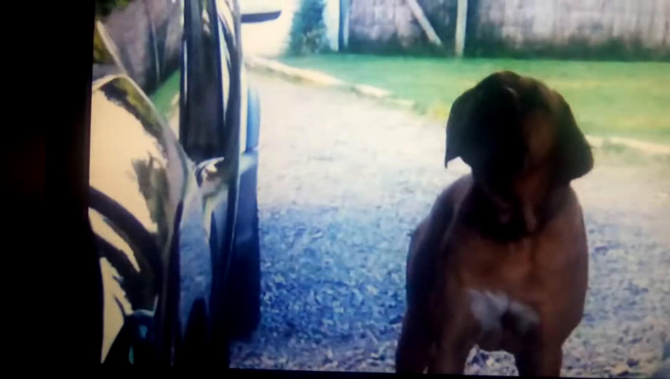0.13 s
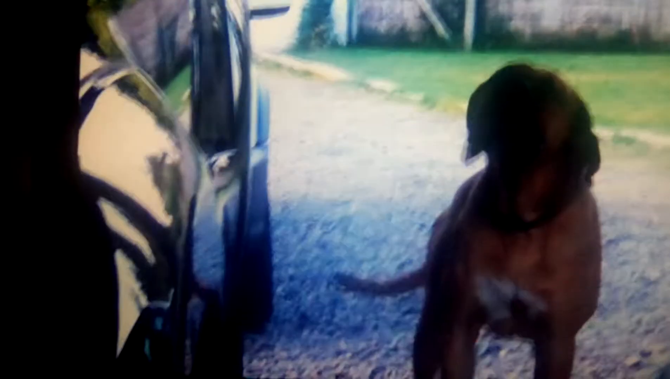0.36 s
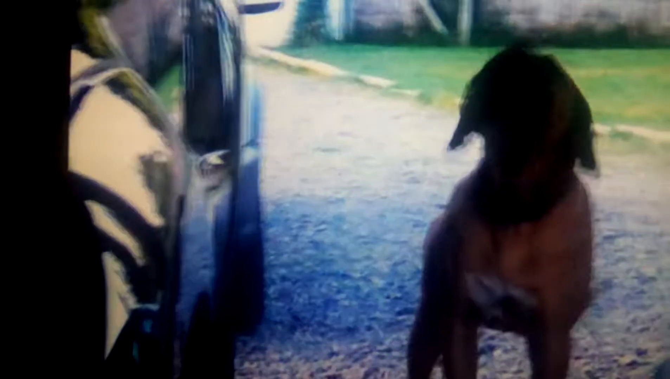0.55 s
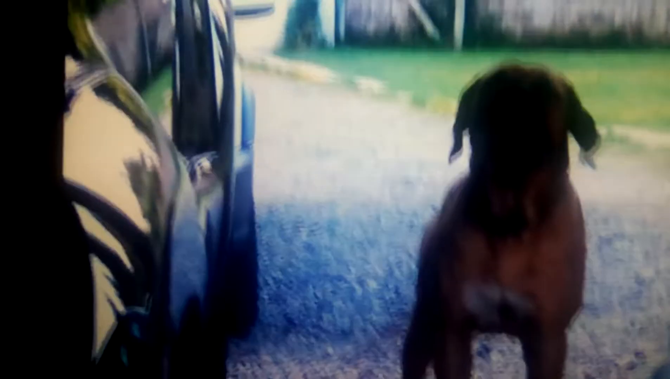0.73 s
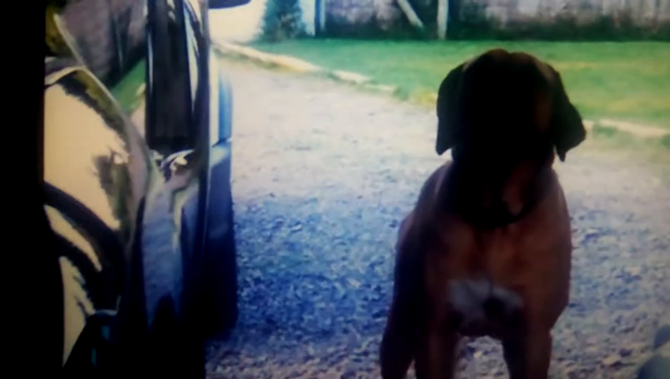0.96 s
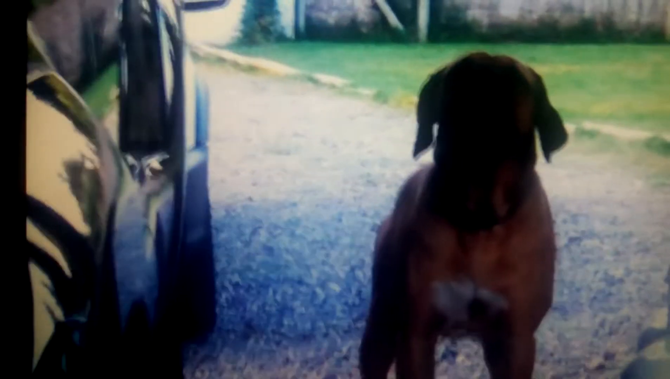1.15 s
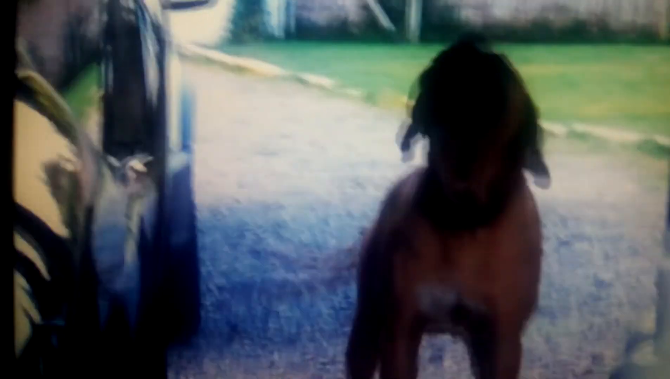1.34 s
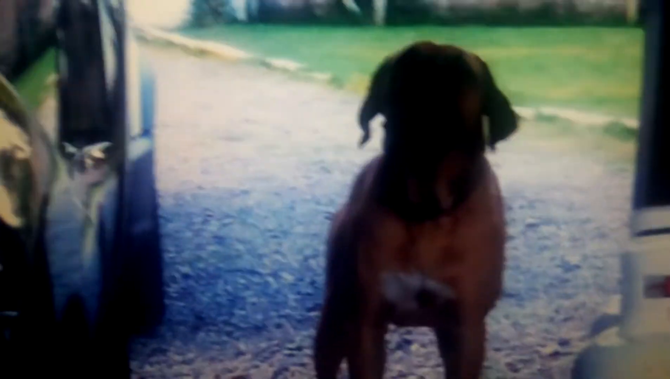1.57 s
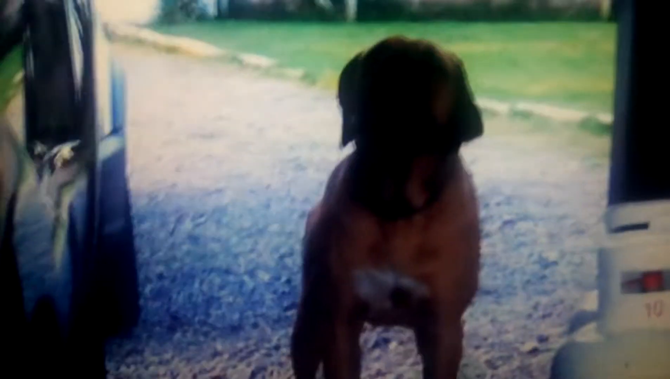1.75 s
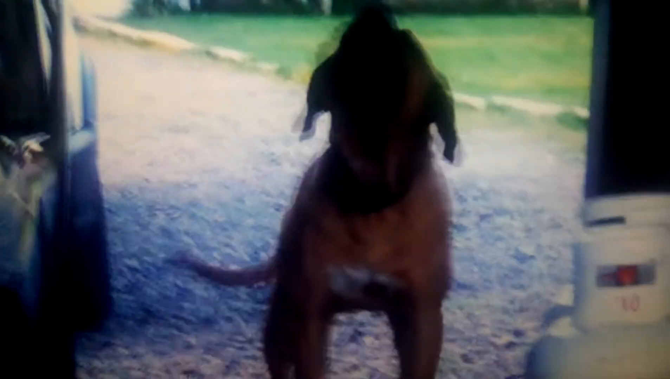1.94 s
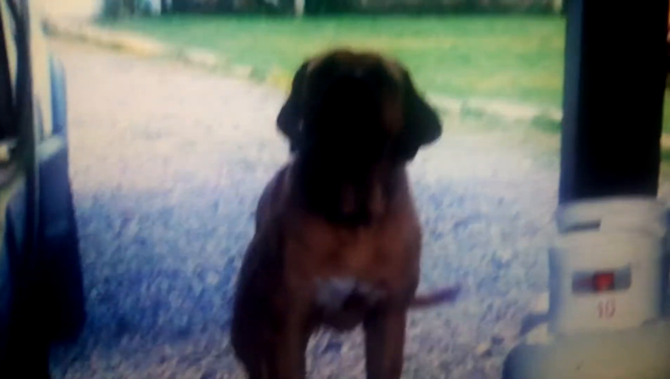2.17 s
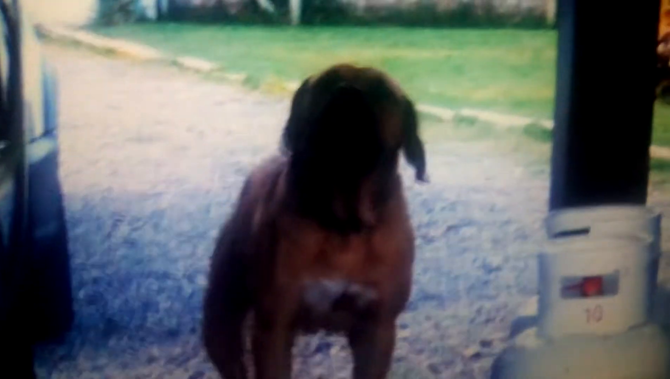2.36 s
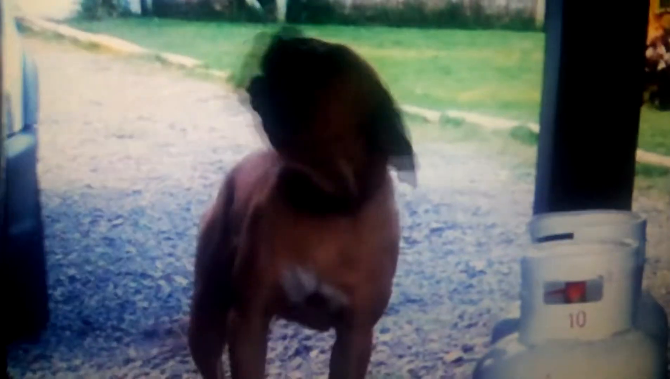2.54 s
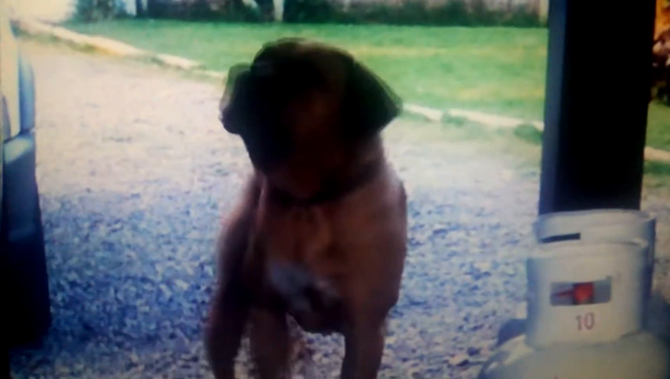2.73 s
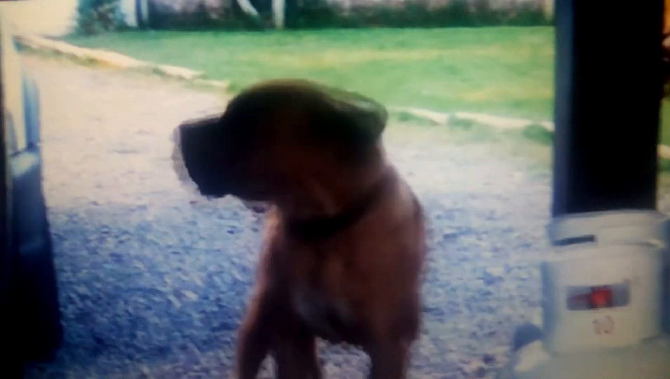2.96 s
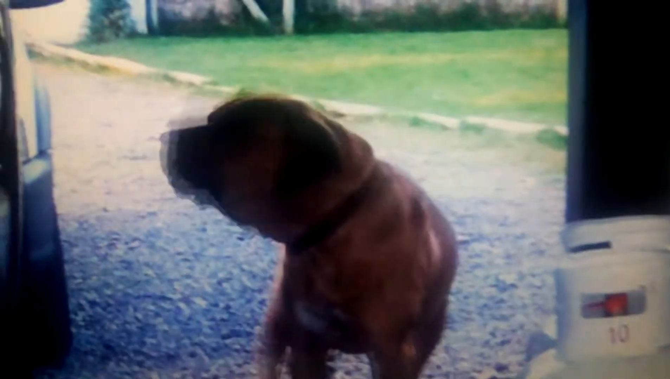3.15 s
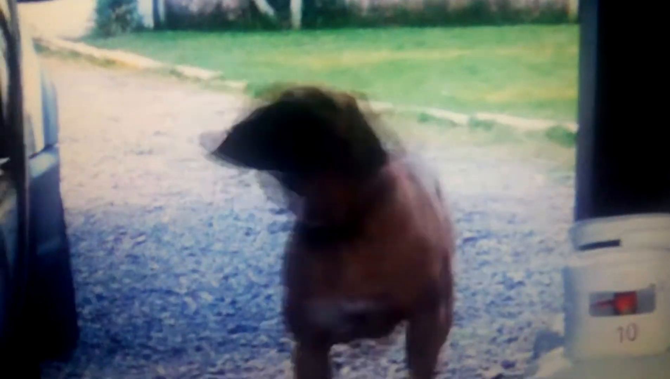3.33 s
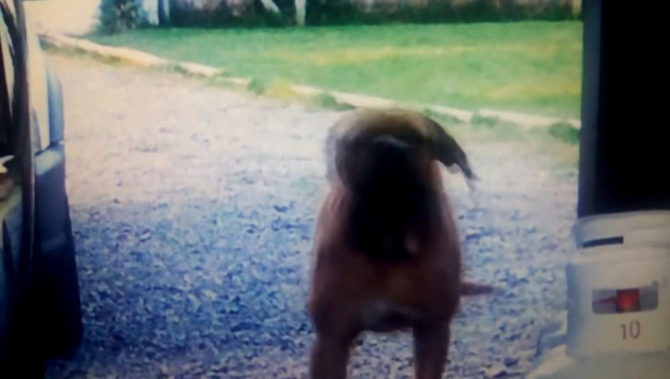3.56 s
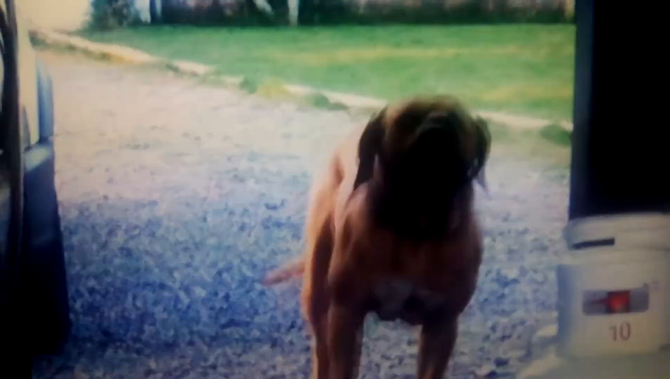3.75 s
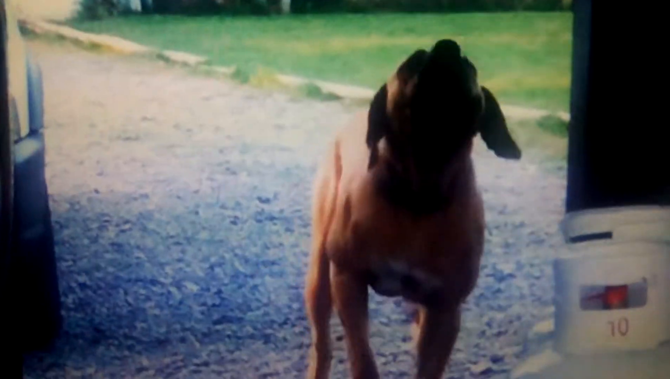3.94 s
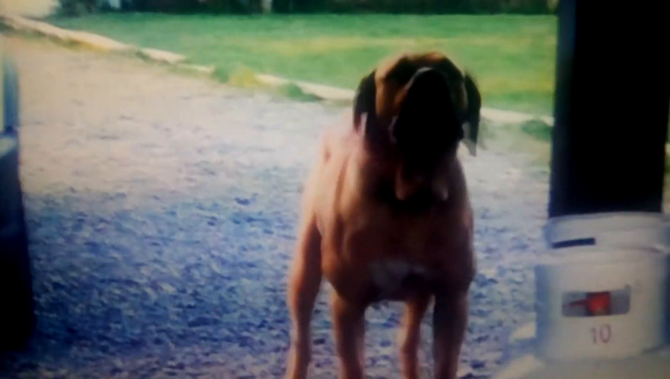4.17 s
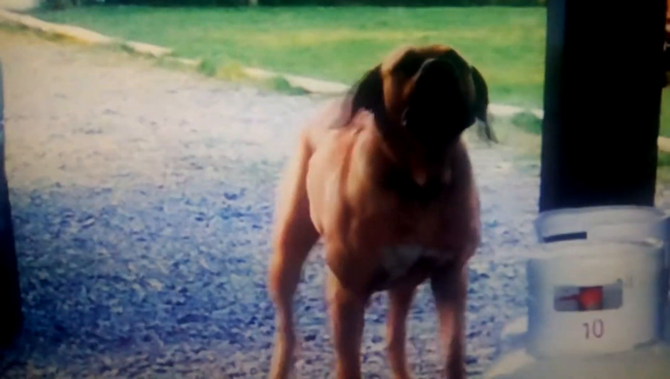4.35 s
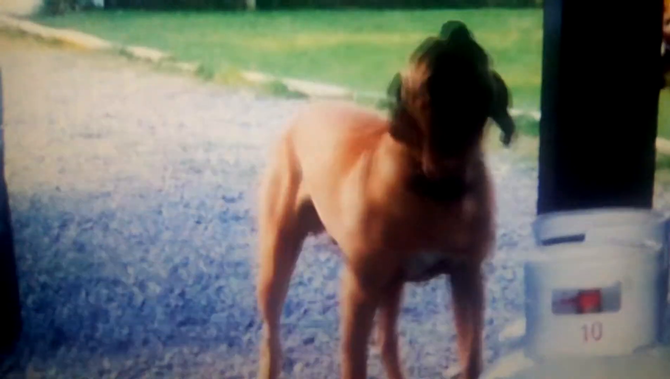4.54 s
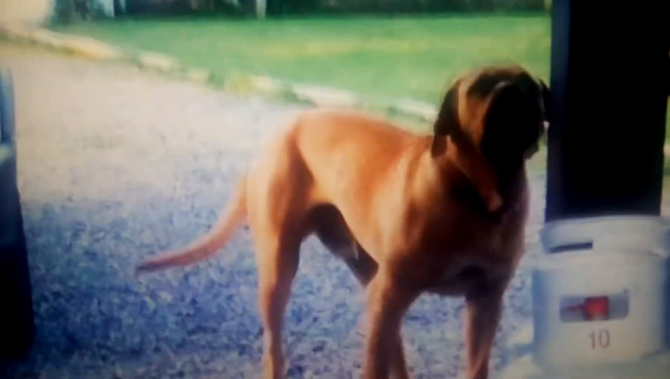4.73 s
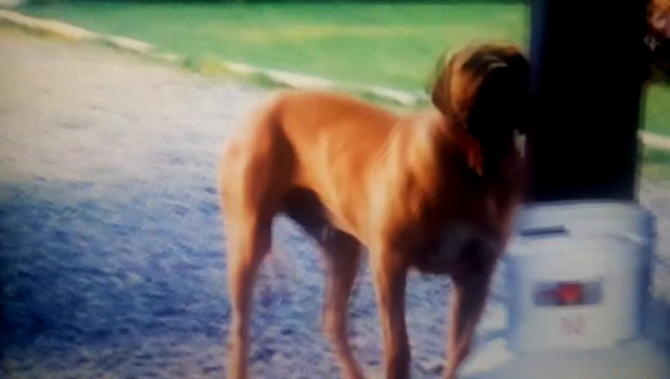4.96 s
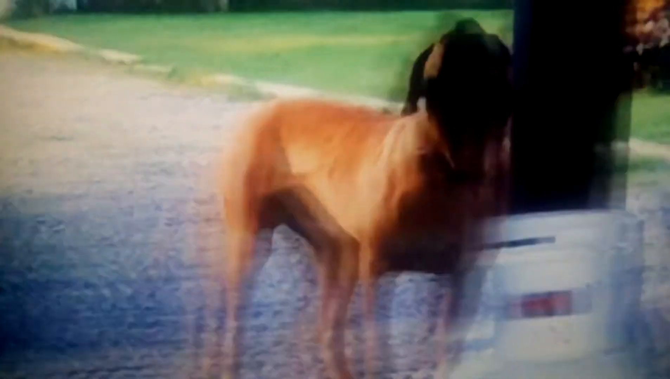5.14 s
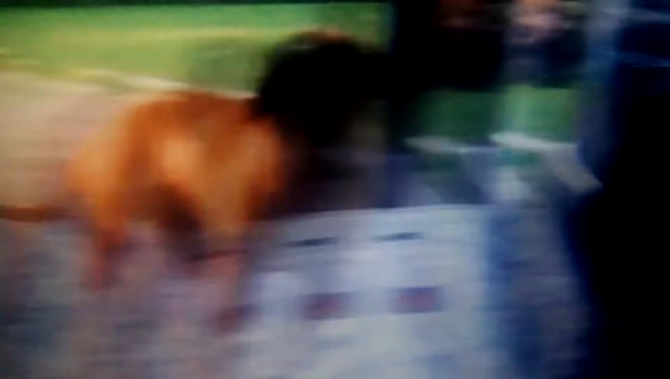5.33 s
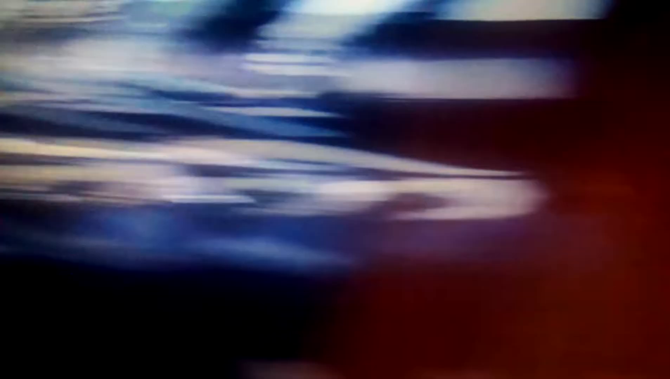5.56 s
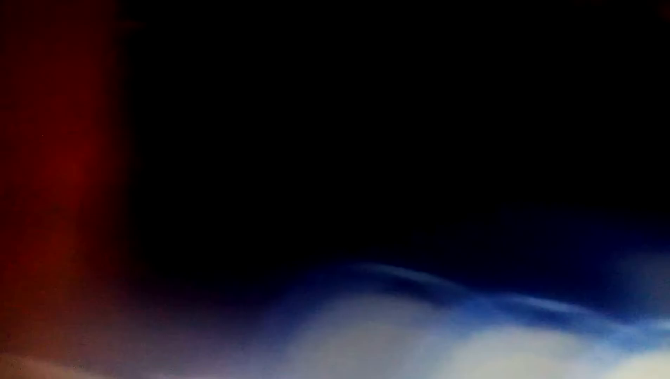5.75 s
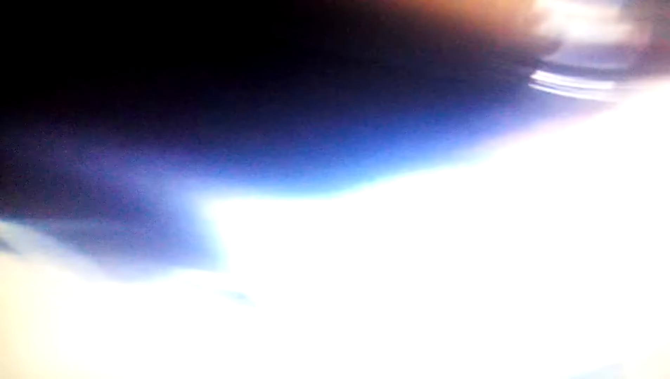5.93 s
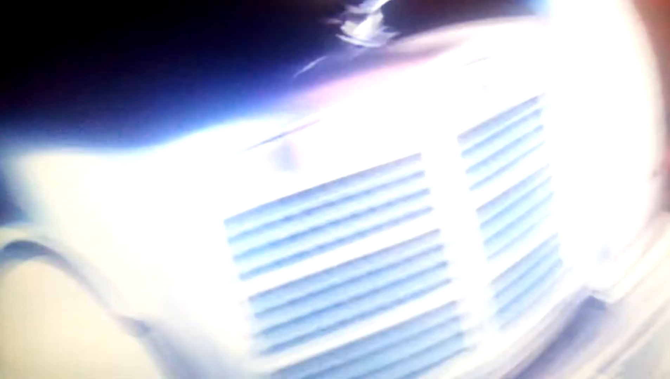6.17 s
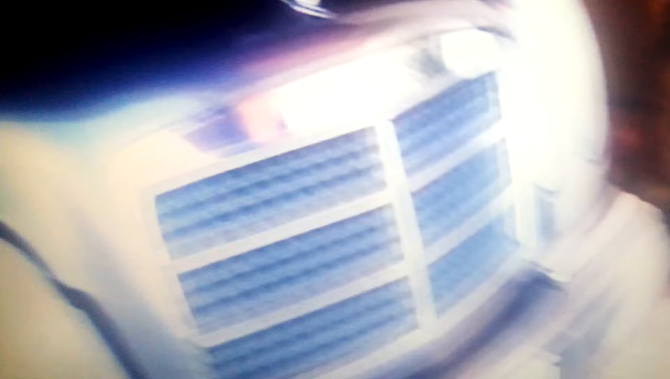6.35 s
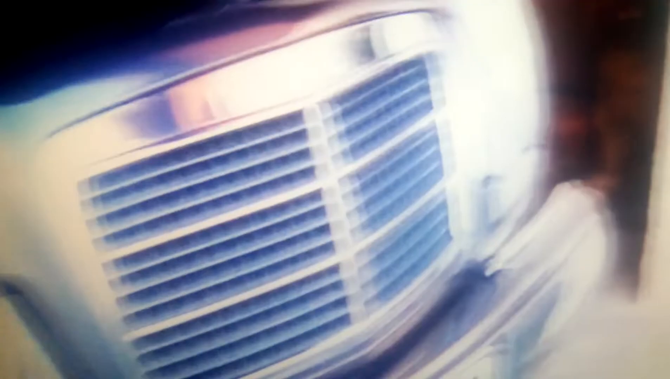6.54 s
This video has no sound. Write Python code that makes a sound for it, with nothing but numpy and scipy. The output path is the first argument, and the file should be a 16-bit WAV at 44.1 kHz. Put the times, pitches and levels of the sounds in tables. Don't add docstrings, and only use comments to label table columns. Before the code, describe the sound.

A large dog stands a few metres from a small camera microphone at a garage mouth and barks nine times, in short, hoarse, chesty bursts. The garage adds a brief boxy ring. Between barks a collar tag ticks and faintly scrapes, and small bumps knock. Faint hum, low rumble and hiss continue underneath; one electrical click comes before the final, strongest bark.

```python
import sys
import numpy as np
from scipy import signal
from scipy.fft import rfft, irfft, next_fast_len
from scipy.io import wavfile
from scipy.ndimage import uniform_filter1d, map_coordinates

SR = 44100
rng = np.random.default_rng(int(sys.argv[2]) if len(sys.argv) > 2 else 0)


def file_out(sig):
    cols = np.atleast_2d(sig).T
    lim = np.clip(cols, -1, 1)
    pcm = np.round(lim * 32767).astype(np.int16)
    wavfile.write(sys.argv[1], SR, pcm)


def magnitude_from_level(level_db):
    exponent = np.asarray(level_db, float) / 20
    return 10 ** exponent


N = 295313
TIME_S = np.arange(N) / SR

# frequency in Hz, level in dB, width in Hz.
HUM_LINES = [(52.7, -71.5, 3), (58.3, -63, 2.83), (119.3, -66.5, 4.7), (136.6, -69.5, 5.3),
             (161.9, -63, 3.026), (180, -63, 3.92), (3720, -80.5, 130), (8200, -76, 960), (295.2, -67, 4.1),
             (12898, -94, 2.4)]
# frequency in Hz, density in dB per Hz.
HISS_SPECTRUM = [(120, -19), (200, -4.5), (215, -6.5), (293, -1.5), (321, -7), (351, -5), (714, -10.5),
                 (796, -12), (1770, -18), (2370, -18.5), (15400, -22)]
# frequency in Hz, density in dB per Hz.
RUMBLE_SPECTRUM = [(22, -39), (32, -19), (45, -38), (70, -0.5), (100, -9.5), (170, -8), (240, -22.5),
                   (300, -50)]
# start in seconds, level in dB, width in seconds, coupling time constant in seconds.
GLITCH_STEP = (5.92548, -24, .00038, .0011)
# frequency in Hz, width in Hz, level in dB.
GARAGE_MODES = [(372, 32, 2), (391, 6.9, 3), (421.4, 33, -2), (491, 13, 2.5), (706, 23, 6.5), (676, 20, -7),
                (754.5, 3, -6), (905, 27, 5), (1040, 6.3, -20), (1156, 22, 10), (1290, 8.4, -13),
                (1280, 28, 4), (1397, 3.7, 6), (2000, 14, 5)]
# frequency in Hz, t60 in seconds.
WALL_DECAY = [(300, 0.32), (1200, 0.33), (4000, 0.32), (10000, 0.087)]
# time in seconds, peak in dB, frequency in Hz, t60 in seconds.
BUMPS = [
    (1.108, -41, 496, 0.018),
    (1.107, -47, 3200, .008),
    (2.981, -40, 2000, 0.006),
    (6.549, -40, 490, 0.081),
    (6.549, -38, 1350, 0.024),
    (6.549, -46, 3400, 0.015),
]
# time in seconds, peak in dB, frequency in Hz, t60 in seconds.
TAG_TICKS = [
    (1.0768, -46, 7850, .005),
    (1.0878, -38, 9280, .004),
    (1.0912, -41, 9500, .002),
    (1.0920, -20, 8240, 0.002),
    (1.0932, -38, 7600, .004),
    (2.79, -45, 8100, 0.008),
    (2.842, -40, 7600, 0.01),
    (2.843, -43, 9600, .009),
]
# start, strongest and end in seconds, level in dB.
TAG_SLIDES = [
    (2.1, 2.25, 2.45, -68),
    (2.788, 2.791, 2.815, -54),
    (2.84, 2.843, 2.895, -56),
    (3.62, 3.84, 3.87, -61),
    (4.3, 4.42, 4.48, -71),
    (4.9, 4.97, 5.05, -60),
]
# start in seconds, length in seconds, pitch in Hz, level in dB.
WHINE_NOTES = [
    (6.2, 0.19, 420, -57.5),
    (4.42, 0.092, 150, -55),
]

# start in seconds, effort in dB, peak held until in seconds, pitch in Hz, roughness 0-1.
BARK_CALLS = [
    (0.427, -47, 0.072, 372, 1.12),
    (1.215, -40.5, 0.051, 344.3, 0.89),
    (1.872, -43.5, 0.063, 380.6, 0.9),
    (2.447, -48.5, 0.099, 372, 1.1),
    (3.198, -42, 0.068, 372, 0.43),
    (3.845, -44, 0.095, 355.2, 0.51),
    (4.477, -42, 0.081, 367.5, 0.34),
    (5.088, -43, 0.13, 372, 0.96),
    (6.292, -38.5, 0.082, 372, 0.7),
]
# level in dB over effort, surge in seconds after start, surge in dB,
# held until in seconds, pitch climb in Hz.
CHEST_MOVES = [
    (7, 0.048, -6.5, 0.073, 55),
    (-11, 0.14, 8, 0.13, 41),
    (-4.5, 0.06, 9.5, 0.17, 45),
    (4.5, 0.079, 4.5, 0.163, 40),
    (1.5, 0.064, 7, 0.12, 8),
    (3.5, 0.056, 13, 0.1, 22),
    (7.5, .068, 13, 0.079, 28),
    (5.5, 0.063, 11.5, 0.14, 50),
    (6.5, 0.076, 8.5, 0.12, 22),
]
# mouth level in dB over effort, held until in seconds, widest opening 0-1,
# shut by in seconds, nose level in dB over effort.
JAW_MOVES = [
    (13.5, 0.118, 0.77, 0.11, 4),
    (9, 0.15, 0.61, 0.12, 6),
    (13, .1, 0.86, .2, 6),
    (14, 0.14, 0.91, 0.18, 6.5),
    (10.5, 0.12, 0.2, 0.15, 5.5),
    (9, 0.177, 0.4, 0.114, 4),
    (6, 0.16, 0.37, 0.07, 5.5),
    (9.5, 0.16, 1, .7, 4),
    (8, 0.14, 0.13, 0.22, 3.5),
]
# attack over the usual one, width of the chest surge in seconds.
BARK_PACE = [
    (1.01, .02),
    (1.01, 0.073),
    (1.01, 0.039),
    (1.01, .05),
    (1.01, 0.024),
    (1.01, 0.014),
    (1.01, .015),
    (1.3, 0.015),
    (1.1, 0.034),
]
# frequency in Hz, width in Hz, level in dB.
NOSE_MODES = [
    [(1200, 200, -6), (1785, 41, -2.5)],
    [(1167, 53, 5), (1670, 35, -4), (1870, 61, -22)],
    [(1112, 43, 16.5), (1344, 24, 10.5), (1616, 85, 5)],
    [(1162, 47, 1.5), (1655, 39, -1.5)],
    [(1092, 91, -0.5), (1410, 38, -10), (1604, 40, -10), (2000, 10, -16)],
    [(1010, 200, 4), (1884, 44, 0)],
    [(1146, 130, 4.5), (1604, 46, -6.5), (1893, 11.5, 10.5)],
    [(1233, 14, -2), (1479, 3.4, -2), (1625, 22, -15.5), (1847, 74, -6.5)],
    [(1050, 125, 10), (1563, 10, 4), (1680, 36, 4), (1850, 8.3, 5)],
]
# frequency in Hz, width in Hz, level in dB.
TEETH_POCKETS = [
    [(2354, 35, -0.5), (2830, 30, -6), (5400, 60, -4), (6760, 51, -12)],
    [(2400, 55, 3), (3200, 300, -2), (6500, 120, -3.5), (8300, 70, -5)],
    [(2760, 18, -4), (5240, 37, -8), (6700, 62, -4), (8170, 38, 0)],
    [(3200, 25, 8), (3860, 39, 8), (6080, 47, 11.5), (7950, 250, 10)],
    [(2860, 100, -2.5), (4670, 54, -15), (5570, 27, -14), (6800, 100, -20)],
    [(3160, 82, 6), (6100, 66, 2), (7070, 49, -7), (7900, 110, -9)],
    [(2664, 17, 9), (3530, 39, 4), (6430, 71, 6), (7900, 34, -3)],
    [(2360, 36, 4), (3100, 73, 4.5), (3960, 99, -1.5), (7050, 35, 4)],
    [(3040, 790, 3), (3800, 42, 2), (5730, 31, 6), (7140, 57, -13)],
]
# frequency in Hz, width in Hz, level in dB.
CHEST_MODES = [(387, 232, 29.5)]
# frequency in Hz, width in Hz, level in dB.
MOUTH_MODES = [(684, 32, 0), (774, 32, 0), (884, 30, 0)]
# frequency in Hz, width in Hz, level in dB.
SINUS_MODES = [(1017, 92, -16.5), (1387, 43, -14.5), (1847, 120, -8.5)]
# frequency in Hz, width in Hz, level in dB.
LARYNX_MODES = [(492.4, 16.5, 0)]
# frequency in Hz, width in Hz, level in dB.
PALATE_POCKETS = [(3233, 15, -6.5), (3870, 30, -3)]
# frequency in Hz, density in dB per Hz.
BREATH_SPECTRUM = [(280, -28), (340, 7.5), (440, 8.5), (482, -2), (530, 4), (620, -16), (885, 5.5),
                   (960, -53), (1050, 6.5), (1400, -11), (2200, -14.5), (2600, -57)]
# frequency in Hz, density in dB per Hz.
RASP_SPECTRUM = [(1240, -24), (2100, -6.5), (2230, -27), (2340, -5.5), (2980, -5.5), (4640, -12.5),
                 (5290, -12.5), (5700, -10.5), (6110, -10.5), (6640, -7.5), (8040, -7.5), (8950, -14),
                 (13000, -30)]
ATTACK_S = {"chest": 0.032, "mouth": 0.044, "nose": 0.049, "rasp": 0.049}
RISE_DB = {"chest": 26.5, "mouth": 28.5, "nose": 29.5, "rasp": 16}
RELEASE_DB_PER_S = {"chest": 158, "mouth": 142, "nose": 131, "rasp": 133}
DROP_DB = {"chest": 7, "mouth": 13, "nose": 4, "rasp": 1.5}

BARK_LENGTH_S, DROP_S, NOSE_LAG_S = 0.3, 0.025, 0.026
CLIMB_S, WIDEST_S = 0.12, 0.069
SURGE_ROBS = 0.43
BITE_DB, BITE_AT_S, BITE_S = -1, 0.033, 0.0067
GAPE_S, GAPE_HZ = 0.037, 4600
POCKETS_CLOSE_DB_PER_S = 42
HISS_DB, RUMBLE_DB, JINGLE_SWELL_DB = -57, -62, 7
TOP_HZ = 15525


def unit(x):
    return x / np.sqrt(np.mean(x ** 2) + 1e-20)


def along(points, hz):
    point_hz, value = np.transpose(points)
    return np.interp(np.log(hz + 1), np.log(point_hz + 1), value)


def wobble(rate_hz):
    knots = rng.standard_normal(int(N * rate_hz / SR) + 4)
    return map_coordinates(knots, [TIME_S * rate_hz])


def drift(length, size):
    return unit(uniform_filter1d(rng.standard_normal(length), size=size))


def filtered(x, response):
    m = next_fast_len(len(x) + SR // 2)
    return irfft(rfft(x, m) * response(np.fft.rfftfreq(m, 1 / SR)), m)[:len(x)]


def shaped(x, spectrum):
    return filtered(x, lambda f: magnitude_from_level(along(spectrum, f)))


def modes(table):
    def response(f):
        return sum((-1) ** k * magnitude_from_level(db) * 1j * f * w / (c * c - f * f + 1j * f * w)
                   for k, (c, w, db) in enumerate(table))
    return response


def steep(table):
    return lambda f: modes(table)(f) ** 2


def hum():
    lines = np.zeros(N)
    for hz, db, width_hz in HUM_LINES:
        level = np.sqrt(2) * magnitude_from_level(db + 3.3 * wobble(width_hz + 1))
        lines += level * np.sin(2 * np.pi * hz * TIME_S + 1.02 * wobble(width_hz + 1))
    hiss = unit(shaped(rng.standard_normal(N), HISS_SPECTRUM))
    rumble = unit(shaped(rng.standard_normal(N), RUMBLE_SPECTRUM))
    return lines + magnitude_from_level(HISS_DB + 0.13 * wobble(2.55)) * hiss + magnitude_from_level(RUMBLE_DB) * rumble


def glitch():
    start_s, db, width_s, droop_s = GLITCH_STEP

    def step(t):
        return np.heaviside(t, 1) * np.exp(-np.abs(t) / droop_s)
    return magnitude_from_level(db) * (step(TIME_S - start_s) - step(TIME_S - start_s - width_s))


def garage(x):
    hz, t, z = signal.stft(rng.standard_normal(SR // 2), SR, nperseg=256)
    decay = magnitude_from_level(-60 * t / along(WALL_DECAY, hz)[:, None])
    tail = signal.istft(z * decay, SR, nperseg=256)[1]
    late = np.pad(x, (400, 0))
    diffuse = signal.fftconvolve(late, tail / np.linalg.norm(tail))[:N]
    return magnitude_from_level(-1.5) * x + magnitude_from_level(-8) * filtered(x, modes(GARAGE_MODES)) + magnitude_from_level(-9.5) * diffuse


def taps(events, spread):
    out, t = np.zeros(N + SR), np.arange(SR // 8) / SR
    for start_s, db, hz, t60_s in events:
        blur = 1 + spread * uniform_filter1d(rng.standard_normal(len(t)), size=8)
        ring = np.sin(2 * np.pi * hz * t) * blur
        envelope = magnitude_from_level(db - 60 * t / t60_s) * (1 - np.exp(-t / 0.00005))
        out[round(start_s * SR):][:len(t)] += envelope * ring
    return out[:N]


def tag():
    level = np.zeros(N)
    for *times_s, db in TAG_SLIDES:
        edge_db = db - JINGLE_SWELL_DB
        level += magnitude_from_level(np.interp(TIME_S, times_s, [edge_db, db, edge_db], left=-120, right=-120))
    flicker = rng.standard_normal(N) * magnitude_from_level(2.1 * wobble(130))
    slide = filtered(flicker, modes([(6940, 840, 1.5), (8340, 700, 4.5)]))
    return level * unit(slide) + taps(TAG_TICKS, spread=0.32)


def whine():
    out = np.zeros(N)
    for start_s, length_s, hz, db in WHINE_NOTES:
        envelope = np.sin(np.pi * np.clip((TIME_S - start_s) / length_s, 0, 1)) ** .5
        out += magnitude_from_level(db) * envelope * np.sin(2 * np.pi * hz * TIME_S + 0.47 * wobble(30))
    return np.sqrt(2) * out


def swell(t, part, held_s, pace):
    after = np.maximum(t - held_s, 0)
    rise = -RISE_DB[part] * np.clip(1 - t / (pace * ATTACK_S[part]), 0, 1) ** 2
    drop = -DROP_DB[part] * np.minimum(after / DROP_S, 1)
    return rise + drop - RELEASE_DB_PER_S[part] * after


def controls(call, chest, jaw, pace, surge_width_s):
    _, effort_db, held_s, pitch_hz, _ = call
    chest_over_db, surge_at_s, surge_peak_db, chest_held_s, climb_hz = chest
    mouth_over_db, mouth_held_s, widest, shut_s, nose_over_db = jaw
    t = np.arange(int(BARK_LENGTH_S * SR)) / SR
    surge_db = surge_peak_db * np.exp(-((t - surge_at_s) / surge_width_s) ** 2)
    chest_db = effort_db + chest_over_db + swell(t, "chest", chest_held_s, pace) + surge_db
    mouth_db = effort_db + mouth_over_db + swell(t, "mouth", mouth_held_s, pace) - SURGE_ROBS * surge_db
    nose_db = effort_db + nose_over_db + swell(t, "nose", held_s + NOSE_LAG_S, pace)
    bite_db = BITE_DB * np.exp(-((t - pace * BITE_AT_S) / BITE_S) ** 2)
    rasp_db = effort_db + swell(t, "rasp", held_s, pace) + bite_db
    pitch = pitch_hz + climb_hz * np.sin(np.pi / 2 * np.clip(t / CLIMB_S, 0, 1)) ** 2
    opening = widest * np.clip((shut_s - t) / (shut_s - WIDEST_S), .1, 1)
    return chest_db, pitch, opening, mouth_db - chest_db, nose_db - chest_db, rasp_db - chest_db


def folds(pitch, rough):
    n = len(pitch)
    phase = np.cumsum(pitch * (1 + .035 * drift(n, 120))) / SR
    pulses = unit(np.diff(np.floor(phase), prepend=0) * magnitude_from_level(2 * rng.standard_normal(n)))
    gate = 1 + .3 * np.cos(2 * np.pi * phase)
    return pulses, gate, unit(gate * rng.standard_normal(n))


def steadied(x, share):
    return unit(x / (uniform_filter1d(np.abs(x), size=500) + 0.21) ** share)


def mouth_sound(source, opening):
    opening = np.clip(opening, 0, 1)
    shut, wide, side = (steadied(unit(filtered(source, steep([m]))), share=.65) for m in MOUTH_MODES)
    return magnitude_from_level(-1.0) * np.sqrt(1 - opening) * shut + np.sqrt(opening) * wide + magnitude_from_level(-17.5) * side


def nose_sound(source, nose):
    nostril = modes([(1500, 1300, 0)])
    return unit(filtered(source, lambda f: (modes(nose)(f) + modes(SINUS_MODES)(f)) * nostril(f)))


def patchy(x, depth_db):
    z = signal.stft(x, nperseg=256)[2]
    field = uniform_filter1d(rng.standard_normal(z.shape), size=12, axis=1)
    return signal.istft(z * magnitude_from_level(depth_db * unit(field)), nperseg=256)[1][:len(x)]


def rasp_sound(source, air, gate, teeth):
    n = len(air)
    t = np.arange(n) / SR
    spit = gate * magnitude_from_level(1.2 * drift(n, 200))
    hiss = shaped(spit * rng.standard_normal(n), RASP_SPECTRUM)
    whistle = np.zeros(n)
    for hz, width_hz, db in teeth + PALATE_POCKETS:
        pocket = filtered(.5 * source + air, steep([(hz, width_hz + hz / 25, db / 2)]))
        whistle += magnitude_from_level(3.8 * drift(n, 900)) * pocket / np.sqrt(hz)
    rasp = unit(patchy(hiss, depth_db=4.0)) + magnitude_from_level(2.5 - POCKETS_CLOSE_DB_PER_S * t) * unit(whistle)
    low = filtered(rasp, lambda f: 1 / (1 + (f / GAPE_HZ) ** 8))
    return unit(rasp - np.clip(1 - t / GAPE_S, 0, 1) ** .5 * low)


def bark(control, rough, nose, teeth):
    chest_db, pitch, opening, mouth_db, nose_db, rasp_db = control
    rough = np.clip(rough, 0, 1)
    pulses, gate, air = folds(pitch, rough)
    source = np.sqrt(1 - rough) * pulses + np.sqrt(rough) * air
    clear = pulses + 0.51 * rough * air
    chest = filtered(clear, lambda f: steep(CHEST_MODES)(f) / (1 + (300 / (f + 1)) ** 8))
    larynx = filtered(air, steep(LARYNX_MODES))
    breath = shaped(air, BREATH_SPECTRUM)
    voice = unit(chest) + magnitude_from_level(-16.5) * unit(larynx)
    voice += magnitude_from_level(mouth_db) * mouth_sound(source, opening)
    voice += magnitude_from_level(np.maximum(mouth_db, nose_db) - 11.5) * unit(breath)
    voice += magnitude_from_level(nose_db - 0.5) * nose_sound(source, nose)
    voice += magnitude_from_level(rasp_db) * rasp_sound(source, air, gate, teeth)
    return signal.windows.tukey(len(pitch), .08) * magnitude_from_level(chest_db) * voice


def dog():
    out = np.zeros(N)
    rows = zip(BARK_CALLS, CHEST_MOVES, JAW_MOVES, BARK_PACE, NOSE_MODES, TEETH_POCKETS)
    for call, chest, jaw, pace, nose, teeth in rows:
        start_s, rough = call[0], call[4]
        sound = bark(controls(call, chest, jaw, *pace), rough, nose, teeth)
        out[round(start_s * SR):][:len(sound)] += sound
    return out


def scene():
    inside = dog() + whine() + tag() + taps(BUMPS, spread=1.3)
    return (garage(inside) + hum())[None]


def low_pass(x):
    return signal.sosfilt(signal.butter(12, 16440, fs=SR, output="sos"), x)


def record(dry):
    wire = dry[0] + glitch()
    mix = filtered(wire, lambda hz: hz < TOP_HZ)[None]
    return low_pass(mix)


dry = scene()
out = record(dry)
file_out(out)
```